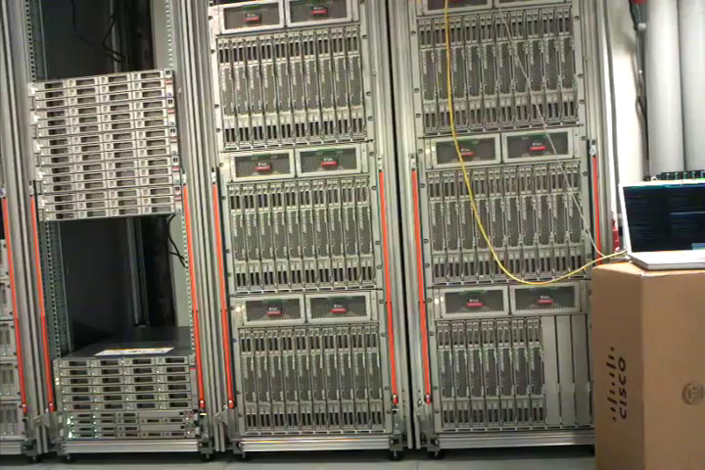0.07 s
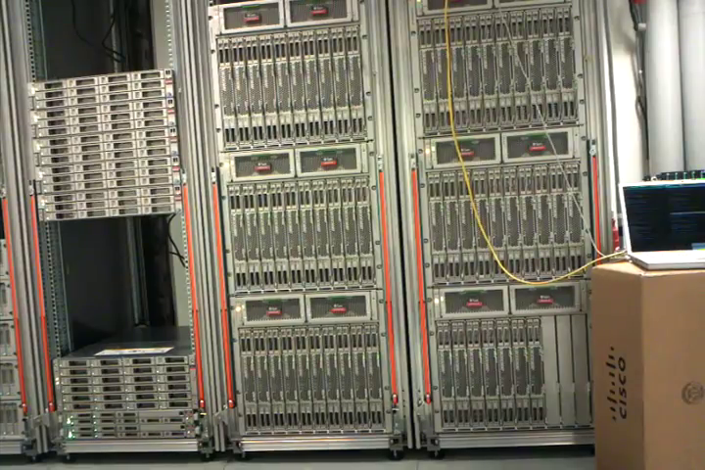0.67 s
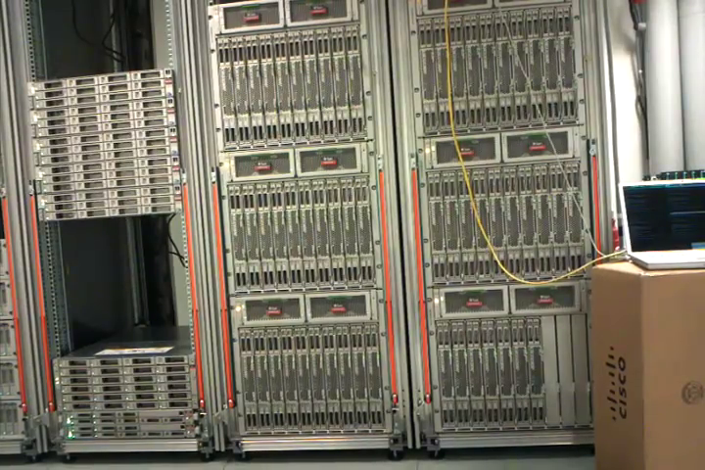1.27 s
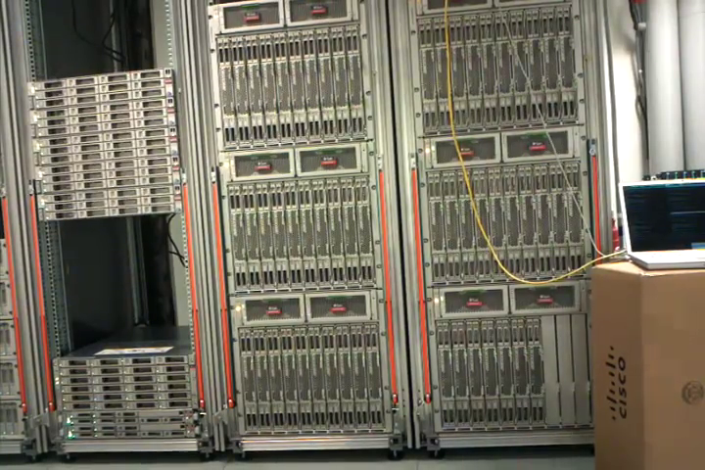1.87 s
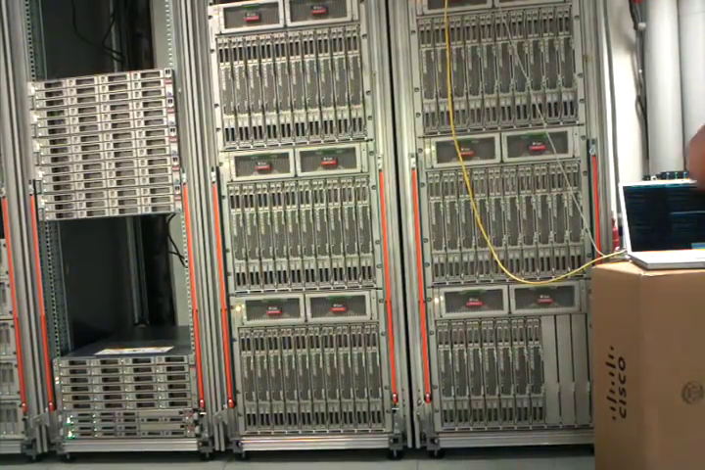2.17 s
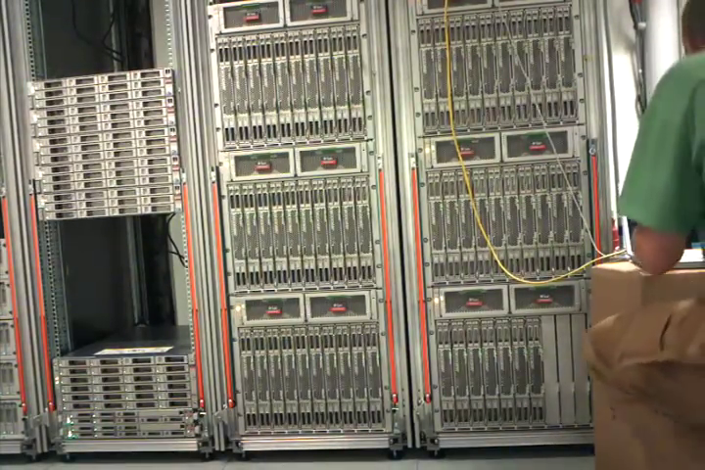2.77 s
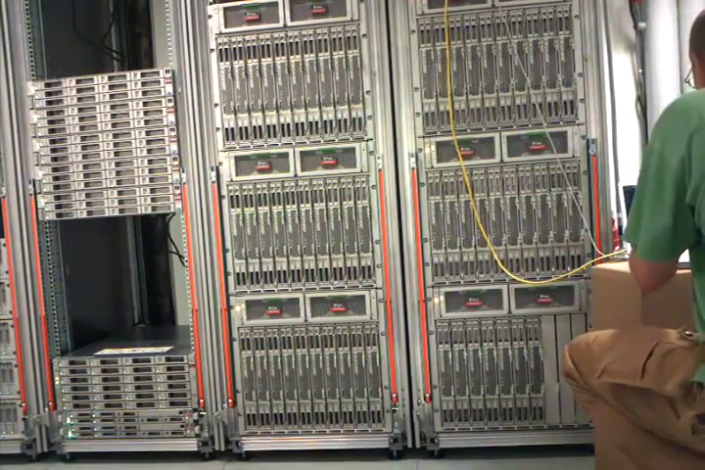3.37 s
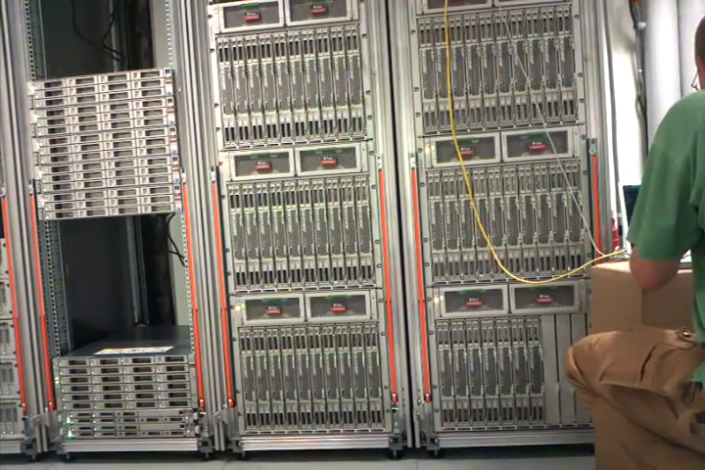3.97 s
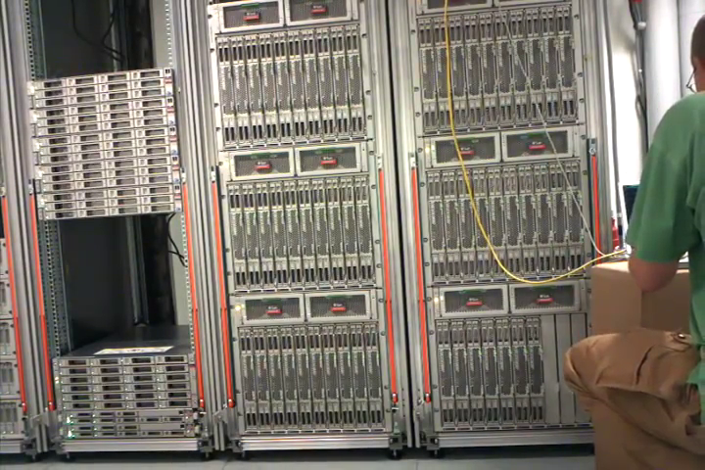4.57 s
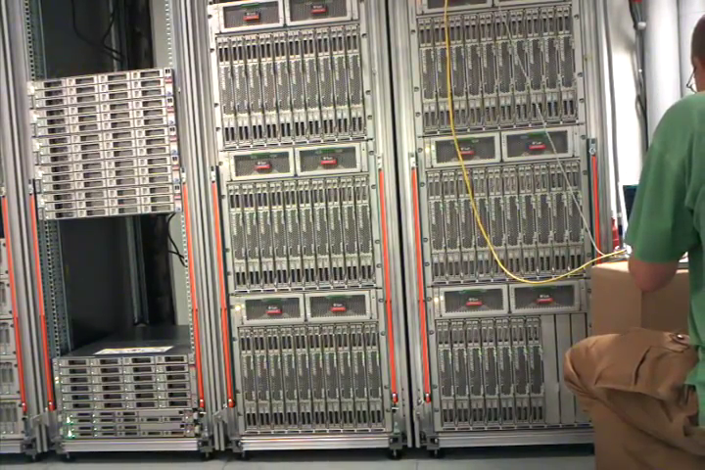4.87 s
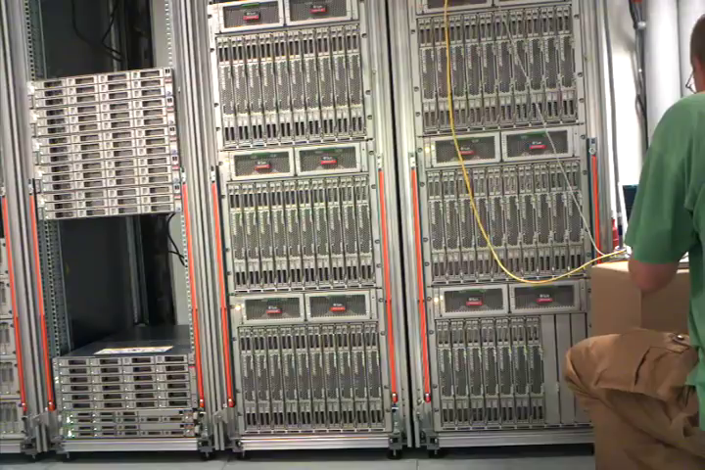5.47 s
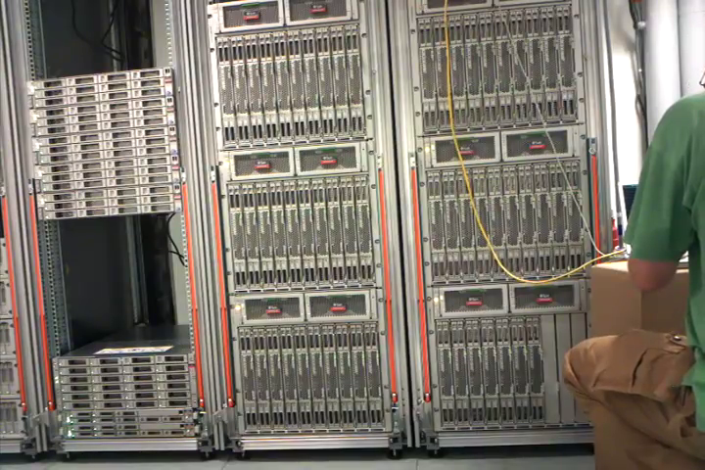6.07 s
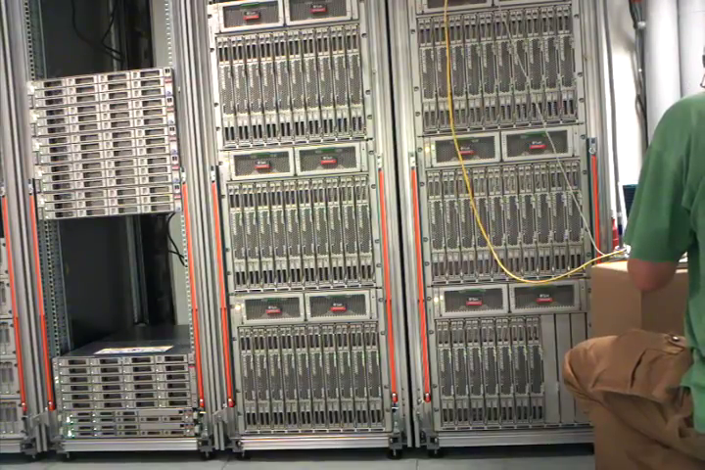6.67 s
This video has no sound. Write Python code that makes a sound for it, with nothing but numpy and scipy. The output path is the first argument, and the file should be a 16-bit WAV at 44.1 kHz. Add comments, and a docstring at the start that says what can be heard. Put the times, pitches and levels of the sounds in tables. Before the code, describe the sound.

It begins in silence. At about 0.7 seconds the roar of many computer server cooling fans fades in, reaching full level by 1 second and holding steady until the end, around 6.7 seconds. The roar is a dense rush of air, strongest in the low and middle range, with a softer hiss from the rack grilles above it. A low fan hum beats within it and throbs briefly at roughly 1.6, 1.9, 2.2, 2.9, 3.9, 4.2, 4.6, 5.2, 5.8 and 6.5 seconds. Several steady tones and thin, higher whines stand just above the noise, wavering and fluttering slightly. Underneath, a very deep room rumble swells gently near 1.9, 3.7 and 5.6 seconds. Everything is heard from one fixed spot a few steps in front of the racks, inside an enclosed equipment room.

```python
"""Hundreds of server fans roar steadily, pushing turbulent air through racks in an equipment room.
The air hisses in grilles and heat sinks, and the room booms at its low modes.
Rotor hums and blade whines stand just above the roar; fans of nearly equal speed beat together.
The sound fades in out of silence."""
import sys
import numpy as np
from scipy import signal
from scipy.fft import rfft, irfft, next_fast_len
from scipy.io import wavfile

SR = 44100
rng = np.random.default_rng(int(sys.argv[2]) if len(sys.argv) > 2 else 0)


def int16_out(signal):
    """Quantize to a 16-bit WAV file."""
    q = np.round(np.clip(np.atleast_2d(signal).T, -1, 1) * 32767)
    wavfile.write(sys.argv[1], SR, q.astype(np.int16))


N = 296793
FFT_SIZE = next_fast_len(N)
TIME_S = np.arange(N) / SR
BIN_HZ = np.fft.rfftfreq(FFT_SIZE, 1 / SR)

# Room and cabinet resonances. Each row: centre in Hz, width in Hz, relative peak density in dB.
ROOM_MODES = [(24.6, 2.1, -33), (29.3, 1.8, -37.5), (36, 3.8, -49), (49.1, 2.7, -43.5), (61.4, 3.5, -42.5),
              (84.8, 8, -43), (110.5, 5.2, -45.5), (121.8, 8.8, -46.5), (140.8, 5.1, -46), (168, 5.4, -46),
              (211.5, 26.4, -50), (413.5, 24, -58), (623, 95, -61)]
# Rotor and blade tones. Each row: frequency in Hz, rms level in dB, rms wander in Hz.
FAN_TONES = [(238, -43, .8), (257.5, -44, .8), (276, -46, 1), (296.3, -40, .25), (314, -47, .5),
             (396.5, -47, .7), (439, -52, 1), (493, -50.5, 1.5), (618.5, -48, .5), (684, -52, 1),
             (1211, -50.5, 2), (1924, -57, 2), (1938, -51, 2), (1950.5, -49.8, 1.2), (1984, -53.5, 8),
             (1997, -49.3, 2), (2678, -63, 5), (8296, -66, 4)]
# Throbs of the hum, as when rotors fall into step. Each row: crest time in seconds, rise in dB.
HUM_THROBS = [(1.61, 9), (1.915, 8), (2.22, 9), (2.885, 9), (3.85, 8), (4.215, 10), (4.63, 8), (5.2, 9),
              (5.84, 6), (6.465, 8)]
# Turbulent fan air. Each row: frequency in Hz, density in dB per Hz.
ROAR_SPECTRUM = [(10, -74), (20, -56), (100, -52), (190, -47.5), (270, -53.5), (360, -58), (520, -60),
                 (740, -59.5), (890, -58), (970, -61.5), (1300, -62), (1900, -66.5), (2300, -69.5),
                 (3000, -77.5), (6000, -99.5)]
# Air in grilles and heat sinks. Each row: frequency in Hz, density in dB per Hz.
HISS_SPECTRUM = [(1500, -84.5), (3000, -74), (4300, -74.5), (5050, -73), (5900, -74.5), (6700, -74.5),
                 (7800, -77), (8400, -76.5), (9900, -78), (10600, -82), (11200, -88.5), (11900, -101)]
# Fade-in. Each row: time in seconds, linear gain.
FADE_IN = [(0.71, 0), (.8, 0.29), (.9, 0.58), (1.01, 1)]


def db_to_gain(db):
    """Decibels to amplitude."""
    return 10 ** (np.asarray(db) / 20)


def unit_rms(x):
    """Scales to rms 1."""
    return x / np.sqrt(np.mean(x ** 2) + 1e-20)


def bin_density(spectrum):
    """Amplitude per root Hz in each bin, interpolated in dB over log frequency."""
    hz, db = np.transpose(spectrum)
    return db_to_gain(np.interp(np.log(BIN_HZ + 1), np.log(hz), db))


def shaped_noise(density):
    """Noise with the given amplitude per root Hz in each bin."""
    white = rfft(rng.standard_normal(FFT_SIZE))
    return irfft(white * density, FFT_SIZE)[:N] * np.sqrt(SR / 2)


def drift(max_hz, count=24):
    """Slow random motion of rms 1: a sum of sines of random phase."""
    coarse_s = np.linspace(0, N / SR, N // 128)
    rates_hz = np.geomspace(max_hz / 20, max_hz, count)[:, None]
    sines = np.sin(2 * np.pi * (rates_hz * coarse_s + rng.random((count, 1))))
    return np.interp(TIME_S, coarse_s, unit_rms(sines.sum(0)))


def fan_tone(hz, wander_hz):
    """A sine of rms 1 that wavers as its fan hunts for speed."""
    cycles = np.cumsum(hz + wander_hz * drift(max_hz=3)) / SR + rng.random()
    return unit_rms(np.sin(2 * np.pi * cycles))


def room_comb(t60_s=0.68, wet=0.39, centre_hz=500):
    """Gain per bin: reflections comb the low mids; higher up the many fans average the comb away."""
    tail_s = np.arange(SR) / SR
    tail = rng.standard_normal(SR) * np.exp(-np.log(1000) * tail_s / t60_s)
    echoes = rfft(tail / np.linalg.norm(tail), FFT_SIZE)
    share = wet * BIN_HZ * centre_hz / (BIN_HZ ** 2 + centre_hz ** 2)
    return abs(1 + share * echoes) / np.sqrt(1 + share ** 2)


def heave(period_s=1.88, crest_s=1.85, width_s=0.32):
    """A rounded swell from 0 to 1 and back, once a period."""
    from_crest_s = (TIME_S - crest_s + period_s / 2) % period_s - period_s / 2
    return np.exp(-(from_crest_s / width_s) ** 2)


def room_boom(split_hz=42, trough_db=-3.5, heave_db=7):
    """Turbulence keeps the low resonances ringing at random; the deepest ones heave."""
    power = sum(db_to_gain(db) ** 2 / (1 + 2 * ((BIN_HZ - hz) / width_hz) ** 2) ** 2
                for hz, width_hz, db in ROOM_MODES)
    deep = shaped_noise(np.sqrt(power) * (BIN_HZ < split_hz))
    upper = shaped_noise(np.sqrt(power) * (BIN_HZ >= split_hz))
    return deep * db_to_gain(trough_db + heave_db * heave()) + upper


def fan_whines(flutter_depth=0.38):
    """Single fans sing their own tones, which flutter in the uneven intake air."""
    whines = np.zeros(N)
    for hz, db, wander_hz in FAN_TONES:
        flutter = 1 + flutter_depth * drift(max_hz=12)
        whines += db_to_gain(db) * unit_rms(flutter * fan_tone(hz, wander_hz))
    return whines


def rotor_hum(hum_hz=201, spread_hz=9, wander_hz=2.5, lead_db=-35, bank_db=-37, count=8):
    """A bank of rotors beats at nearly equal speeds; one near rotor leads, throbbing at set times."""
    bank_hz = hum_hz + spread_hz * np.linspace(-1, 1, count)
    bank = unit_rms(sum(fan_tone(hz, wander_hz) for hz in bank_hz))
    throb_width_s = 0.04
    throb_db = sum(rise_db * np.exp(-((TIME_S - crest_s) / throb_width_s) ** 2)
                   for crest_s, rise_db in HUM_THROBS)
    lead = fan_tone(hum_hz, wander_hz)
    return db_to_gain(lead_db + throb_db) * lead + db_to_gain(bank_db) * bank


def airflow(roar_surge_db=0.26, hiss_surge_db=0.16, eddy_db=0.33):
    """Roar and hiss swell slightly with one unsteady flow; quick eddies ruffle both."""
    flow = drift(max_hz=4.4)
    comb = room_comb()
    roar = shaped_noise(comb * bin_density(ROAR_SPECTRUM)) * db_to_gain(roar_surge_db * flow)
    hiss = shaped_noise(comb * bin_density(HISS_SPECTRUM)) * db_to_gain(hiss_surge_db * flow)
    eddies = drift(max_hz=30)
    return (roar + hiss) * db_to_gain(eddy_db * eddies)


def scene():
    """All the racks in mono, from a few steps in front."""
    return (airflow() + room_boom() + rotor_hum() + fan_whines())[None]


def record(dry):
    """Silence, a short fade-in, and a low-pass over the whole."""
    cutoff_hz = 11930
    fade = np.interp(TIME_S, *np.transpose(FADE_IN))
    low_pass = signal.firwin(511, cutoff_hz, window=("kaiser", 9), fs=SR)
    return signal.oaconvolve(dry * fade, low_pass[None], "same")


dry = scene()
out = record(dry)
int16_out(out)
```